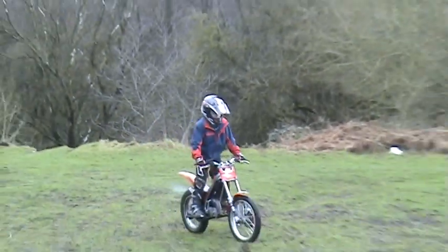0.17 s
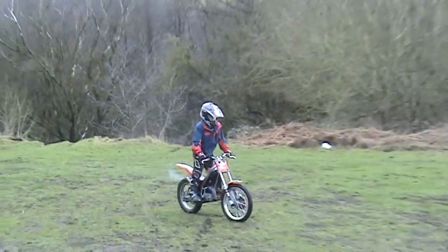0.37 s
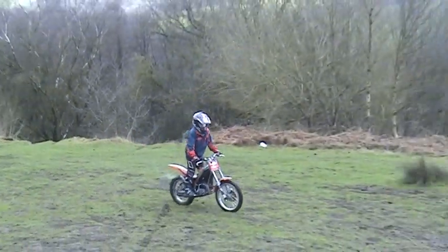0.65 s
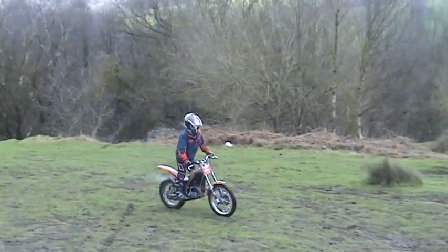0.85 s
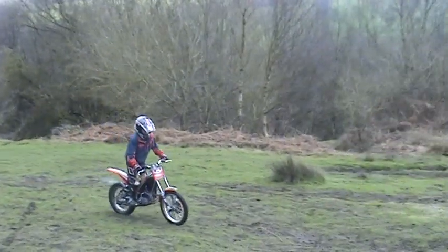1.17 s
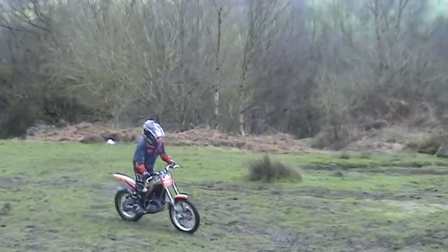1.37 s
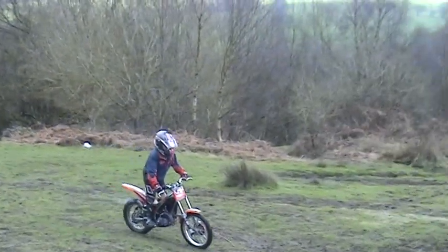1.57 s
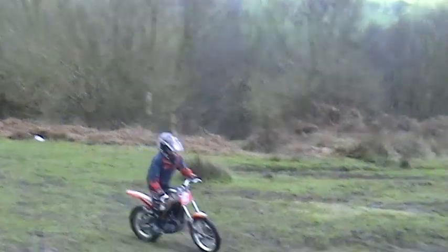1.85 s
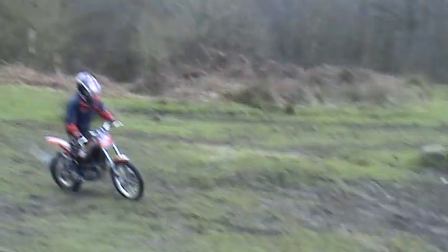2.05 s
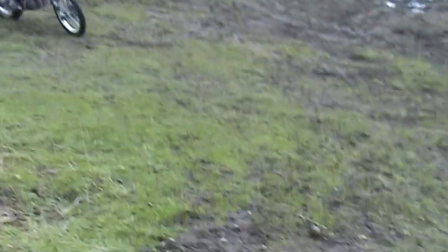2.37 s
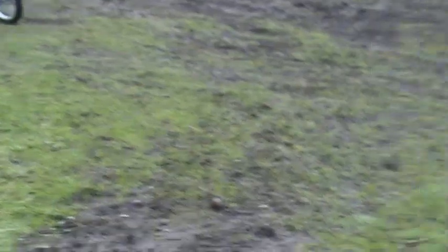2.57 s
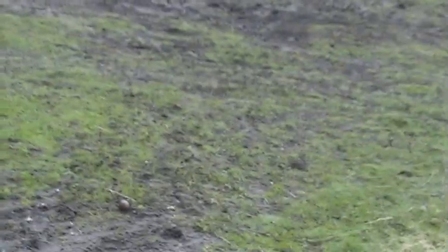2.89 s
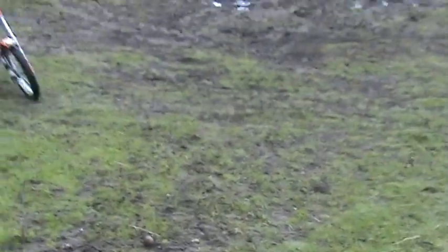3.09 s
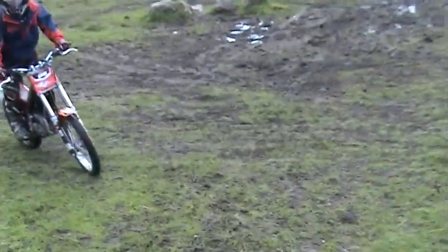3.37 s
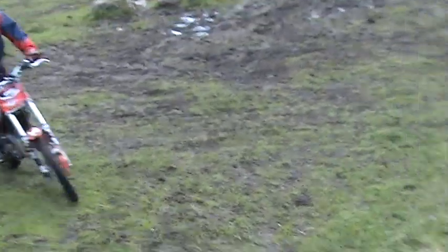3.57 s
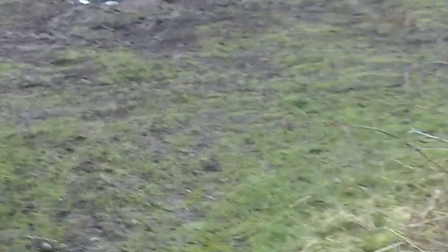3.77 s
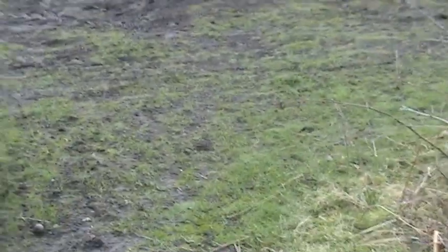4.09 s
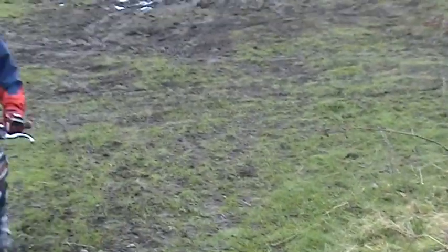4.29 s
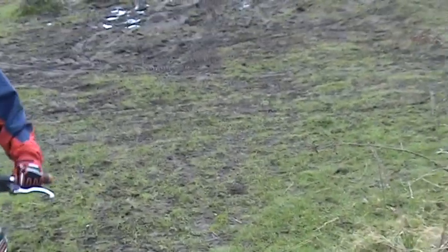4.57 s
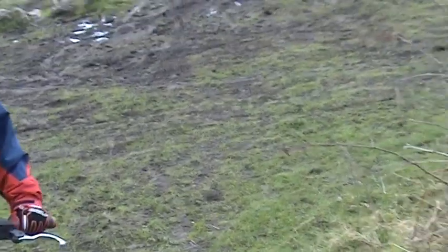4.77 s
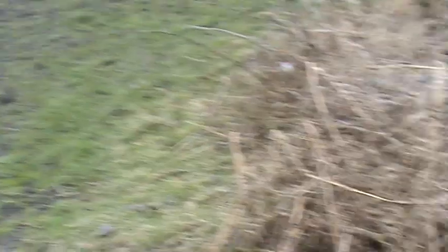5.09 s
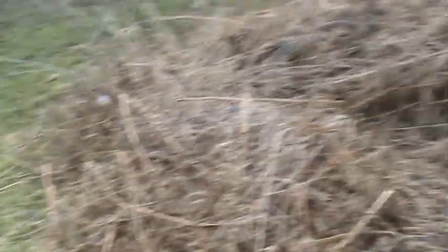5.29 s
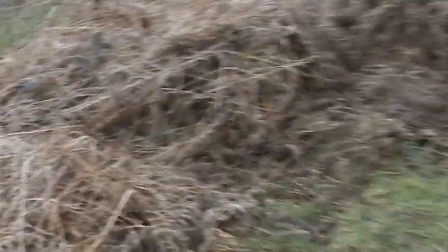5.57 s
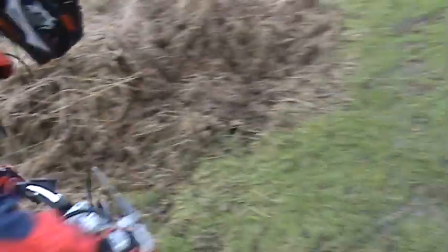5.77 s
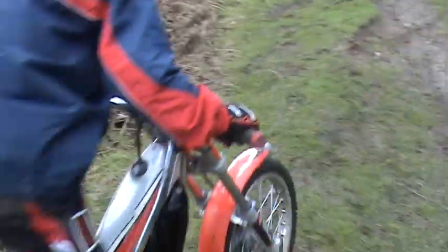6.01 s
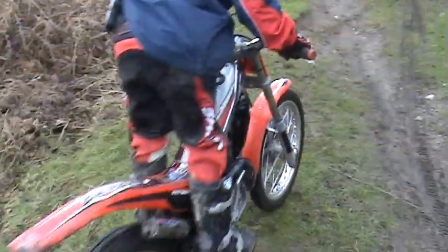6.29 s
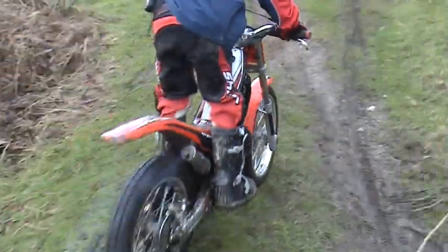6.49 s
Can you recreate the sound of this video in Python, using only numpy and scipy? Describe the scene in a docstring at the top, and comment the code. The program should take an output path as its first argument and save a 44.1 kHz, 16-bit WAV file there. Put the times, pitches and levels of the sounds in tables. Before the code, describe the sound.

Outdoors on soft grass, a single-cylinder two-stroke bike holds a fast, buzzing, metallic rasp over a low drone and light mechanical whir. It recedes, drops a few firings in a short stutter, revs slightly higher and comes back. The tone turns boxy and hollow as it faces the listener, then brash and hissy as it sweeps past close to the microphone and leaves. Little echo, only faint air murmur.

```python
"""In a wet field a two-stroke trials motorcycle rides off, stumbles for a few firings, returns and passes close by.
Each firing sends a sharp crack out of the silencer, rings the pipe and airbox and leaves a puff of gas hiss;
the low engine orders drone underneath, the crankcase whirs and the open air murmurs and hisses faintly.
The colour changes with the side that faces the listener, and the bounce off the wet ground sweeps a comb
(a row of notches) through the exhaust as the machine passes."""
import sys
import numpy as np
from scipy import signal
from scipy.fft import rfft, irfft, next_fast_len
from scipy.io import wavfile
from scipy.ndimage import uniform_filter1d, map_coordinates

SR = 44100
rng = np.random.default_rng(int(sys.argv[2]) if len(sys.argv) > 2 else 0)


def wav_out(sig):
    """Save sig, one row per channel (or a flat mono array), as 16-bit PCM at SR to the path in sys.argv[1]."""
    wavfile.write(sys.argv[1], SR, np.round(np.clip(np.atleast_2d(sig).T, -1, 1) * 32767).astype(np.int16))


N = 292824
SIZE = 2048  # length of one burst, samples
TIME = np.arange(N) / SR  # s
AGE = np.arange(SIZE) / SR  # time since a burst began, s
HZ = np.fft.rfftfreq(SIZE, 1 / SR)  # frequencies in the spectrum of a burst

# crank speed: (time [s], speed [turns per second])
CRANK_SPEED = [(0.0, 83.0), (0.13, 82.8), (0.31, 84.7), (0.79, 86.4), (1.05, 84.9), (1.2, 86.3),
               (1.61, 87.8), (1.85, 85.0), (1.9, 78.1), (1.92, 77.2), (2.11, 89.1), (2.16, 90.6),
               (2.52, 89.8), (2.64, 88.1), (2.83, 87.4), (3.12, 88.4), (3.22, 89.9), (3.37, 88.9),
               (3.48, 91.8), (3.7, 93.8), (4.05, 92.3), (4.42, 93.5), (4.77, 85.1), (4.83, 85.2),
               (5.07, 90.8), (5.29, 92.8), (5.77, 92.5), (6.01, 94.5), (6.42, 89.7), (6.64, 89.2)]
# the ride: (time [s], distance [m], angle between the machine's nose and the listener [degrees])
RIDE_PATH = [(0, 5.9, 50), (1.2, 16.2, 37), (2.6, 21, 30), (3.22, 9.9, 33.4), (3.5, 7.4, 13),
             (4.35, 7.4, 3.9), (4.65, 4.44, 32), (5.05, 3.8, 37), (5.55, 2.24, 89.4), (6, 1.6, 121),
             (6.3, 3.64, 150), (6.64, 7.3, 161)]
# centres of the silencer's boom, of the pipe's bark, which sinks when the rider eases off, and of the
# airbox's gulp: (time [s], boom [Hz], pipe [Hz], airbox [Hz])
CAVITY_CENTRES = [(0, 620, 740, 1140), (.6, 600, 930, 1130), (1.4, 578, 975, 1200), (2.1, 625, 1010, 1145),
                  (2.5, 567, 995, 1127), (3.4, 600, 876, 1194), (3.9, 636, 876, 1134),
                  (4.4, 666, 915, 1170), (4.9, 590, 830, 1210), (5.15, 619, 854, 1130),
                  (5.5, 553, 960, 1070), (5.72, 550, 990, 1170), (5.9, 647, 870, 1220),
                  (6.3, 620, 930, 1225), (6.64, 670, 875, 1140)]
SWAY_RATE = 6  # random turning points a second as the machine rocks over the grass


def amp(db):
    """Decibels to gain."""
    return 10 ** (np.asarray(db) / 20)


def unit(x):
    """Scale to rms 1."""
    return x / np.sqrt(np.mean(x ** 2) + 1e-20)


def along(points, hz):
    """Read (Hz, value) points on a log frequency axis."""
    f, v = np.transpose(points)
    return np.interp(np.log(hz + 1), np.log(f + 1), v)


def read(rows, when):
    """Each column of a curve table at the given times."""
    s, *cols = np.transpose(rows)
    return [np.interp(when, s, c) for c in cols]


def lobe(x, centre, width):
    """A bell that is 1 at the centre."""
    return np.exp(-((x - centre) / width) ** 2)


def wobble(rate):
    """A smooth random curve through rate random points a second."""
    coarse = TIME[::SIZE // 16]
    points = rng.standard_normal(int(N * rate / SR) + 4)
    curve = map_coordinates(points, [coarse * rate])
    return np.interp(TIME, coarse, curve)


def sway(when, rate):
    """A slow random rocking, read at the firing times."""
    return np.interp(when, TIME, wobble(rate))


def filtered(x, response):
    """x times a response of frequency."""
    m = next_fast_len(N + SR // 2)
    spectrum = rfft(x, m) * response(np.fft.rfftfreq(m, 1 / SR))
    return irfft(spectrum, m)[..., :N]


def causal(db):
    """Minimum-phase responses with the given colours in dB: a sharp front, ringing after it."""
    cepstrum = irfft(np.log(amp(db)))
    cepstrum[:, 1:SIZE // 2] *= 2
    cepstrum[:, SIZE // 2 + 1:] = 0
    return np.exp(rfft(cepstrum))


def resonance(centre_hz, width_hz):
    """A resonance passed twice, so that its skirts are steep."""
    once = 1j * HZ * width_hz / (centre_hz ** 2 - HZ ** 2 + 1j * HZ * width_hz)
    return once ** 2


def delayed(ms):
    """The response of a plain delay."""
    return np.exp(-2j * np.pi * HZ * ms / 1000)


def tails(count, t60, hold=0):
    """Spectra of noise bursts of energy 1 that last for hold seconds, then drop 60 dB every t60 seconds."""
    burst = rng.standard_normal((count, SIZE)) * amp(-60 * np.maximum(AGE - hold, 0) / t60)
    return rfft(burst / np.linalg.norm(burst, axis=1, keepdims=True))


def closeness(when):
    """0 at 10 m and beyond, 1 within about 3 m."""
    distance = read(RIDE_PATH, when)[0]
    return np.clip(np.log(10 / distance) / np.log(3.4), 0, 1)[:, None]


def facing(when):
    """How squarely the nose and the tail face the listener, 0-1 each."""
    front_width, rear_width = 36.7, 28  # degrees
    angle = read(RIDE_PATH, when)[1]
    return lobe(angle, 0, front_width), lobe(angle, 180, rear_width)


def throttle(when):
    """0 while coasting, 1 while the crank gains speed fastest."""
    full_throttle = 57  # gain of speed, turns per second each second
    smooth_speed = uniform_filter1d(read(CRANK_SPEED, TIME)[0], size=4000)
    gain = np.gradient(smooth_speed) * SR
    return np.interp(when, TIME, np.clip(gain / full_throttle, 0, 1))


def burning(when):
    """True while the cylinder fires."""
    # stretches in which the charge does not light: (start [s], end [s])
    misfires = [(.177, .189), (1.84, 1.914)]
    return np.all([(when < a) | (when > b) for a, b in misfires], axis=0)


def firing_times(turns):
    """The moment in seconds at which the crank completes each turn."""
    return np.interp(np.arange(np.floor(turns[-1])), turns, TIME)


def level(part, when):
    """The dB of one part at the listener, from distance, the side turned to them, throttle and rocking."""
    # how each part radiates: name: (level at the reference distance [dB], rise per halving of the
    # distance [dB], rise head-on [dB], rise from behind [dB], angle of a side lobe or null [degrees],
    # rise there [dB], rise at full throttle [dB])
    radiation = { "order 1": (-46.5, 3.5, -7.5, -3.5, 75, -16, -4),
                 "order 2": (-43.5, 3.5, 15, -9, 97, -13.5, -1.5),
                 "order 3": (-39, 4, 10.5, 6, 147, -17.5, 2.5),
                 "order 4": (-56, 9, -12, -36, 85.5, 8, 16.5), "crack": (-25, 0.38, -2.5, 5, 116.5, 5, -2),
                 "fizz": (-38, 1.03, 1.5, 18, 129.5, 8, 4)}
    reference_m, side_width, sway_db = 10, 22.4, 1.74  # m, degrees, dB
    base_db, nearer_db, ahead_db, behind_db, side_deg, side_db, throttle_db = radiation[part]
    distance, angle = read(RIDE_PATH, when)
    ahead, behind = facing(when)
    pattern_db = ahead_db * ahead + behind_db * behind + side_db * lobe(angle, side_deg, side_width)
    pattern_db += sway_db * sway(when, SWAY_RATE)
    return base_db + nearer_db * np.log2(reference_m / distance) + pattern_db + throttle_db * throttle(when)


def levelled(spectra, db, when, band):
    """Scale the firings, averaged over five, so that their train has level db inside the band."""
    inside = (HZ > band[0]) & (HZ < band[1])
    energy = 2 * np.sum(abs(spectra[:, inside]) ** 2, axis=1) / SIZE
    power = energy * read(CRANK_SPEED, when)[0] / SR
    gain = amp(db) / np.sqrt(uniform_filter1d(power, size=5) + 1e-20)
    return spectra * gain[:, None]


def train(spectra, when):
    """Lay one burst at each firing time, between the samples."""
    start, fraction = np.divmod(when * SR, 1)
    bursts = irfft(spectra * np.exp(-2j * np.pi * HZ * fraction[:, None] / SR))
    places = start.astype(int)[:, None] + np.arange(SIZE)
    return np.bincount(places.ravel(), bursts.ravel(), N)[:N]


def air(db):
    """Open air: a faint uneven murmur and hiss of shaped noise, different on the left and right."""
    # colour of the open air: (frequency [Hz], relative level per Hz [dB])
    air_colour = [(20, -20), (30, -22), (42, -19), (70, -16), (130, 11), (400, 5.5), (1500, -34),
                  (8000, 10), (15000, -49)]
    noise = rng.standard_normal((2, N))
    shaped = unit(filtered(noise, lambda hz: amp(along(air_colour, hz))))
    return amp(db + 0.53 * wobble(6.0)) * shaped


def crankcase(turns, db, swing_db):
    """Gears and piston rattle on, fired or not, swelling once a turn; partly different left and right."""
    # colour of the whir and gear rattle: (frequency [Hz], relative level per Hz [dB])
    whir_colour = [(150, -10), (400, -6.5), (800, -5), (1250, 2), (1700, -1.5), (2600, 1), (3800, -7.5),
                   (4800, -13), (6500, -9), (9000, -50), (12000, -20), (15000, -47)]
    noise = rng.standard_normal(N) + 0.12 * rng.standard_normal((2, N))
    rattle = unit(filtered(noise, lambda hz: amp(along(whir_colour, hz))))
    return amp(db + swing_db * np.cos(2 * np.pi * (turns - .3)) + wobble(14)) * rattle


def drone(turns, fifth_db, misfire_db):
    """The pulsing of the expansion chamber: clean low orders (multiples of crank speed), weaker in a misfire."""
    # the chamber lifts an order that passes through its resonance
    chamber_hz, chamber_width_hz, chamber_db = 231, 23, 8.5
    when = firing_times(turns)
    levels = [level(part, when) for part in ("order 1", "order 2", "order 3", "order 4")]
    levels.append(levels[-1] + fifth_db)  # the fifth follows the fourth
    sag_db = misfire_db * uniform_filter1d(1. - burning(when), size=3)
    speed, out = read(CRANK_SPEED, when)[0], np.zeros(N)
    for order, db in enumerate(levels, 1):
        db = db + sag_db + chamber_db * lobe(order * speed, chamber_hz, chamber_width_hz)
        waver_db = .35 * wobble(35)
        gain = np.sqrt(2) * amp(np.interp(TIME, when, db) + waver_db)
        out += gain * np.cos(2 * np.pi * order * (turns - .22))
    return out


def reflections(when, t60, hold=0, count=12):
    """One pattern of reflections per firing; it drifts as the machine moves, faster when it is close."""
    patterns = tails(count, t60, hold)
    # even out the broad colour of each pattern
    patterns /= np.sqrt(uniform_filter1d(abs(patterns) ** 2, size=12, axis=1) + 1e-9)
    place = np.cumsum(1 + 2 * closeness(when))
    place = place / place[-1] * (count - 1)
    # cross-fade from each pattern to the next
    blend = np.cos(np.pi / 2 * np.clip(place[:, None] - np.arange(count), -1, 1))
    return blend @ patterns


def ground(when):
    """The wet grass returns a duller copy, stronger up close; its changing lag slides a comb through the exhaust."""
    # lag of the bounce behind the direct sound, longest as the machine passes: (time [s], lag [ms])
    ground_lag = [(0, .46), (.4, .54), (1.2, .49), (1.8, .5), (2.3, .46), (2.7, .48), (3, .57), (3.25, .73),
                  (3.6, .8), (3.95, 1.01), (4.25, 1.12), (4.85, 1.19), (5.05, 1.4), (5.55, 2.05),
                  (5.75, 2.43), (6, 2.9), (6.15, 2.56), (6.64, 1.7)]
    far, near, soak_hz = .4, .52, 8000  # shares that bounce; the grass soaks up the treble
    bounce = (far + (near - far) * closeness(when)) / (1 + (HZ / soak_hz) ** 2)
    lag_ms = read(ground_lag, when[:, None])[0]
    return (1 + bounce * delayed(lag_ms)) / np.sqrt(1 + bounce ** 2)


def paths(when):
    """Every pulse is heard again after its trip down the expansion chamber, and again off the ground."""
    round_trip_ms, share_back = 3.88, .18
    return (1 + share_back * delayed(round_trip_ms)) * ground(when)


def airbox(when):
    """The airbox gulps at each turn, kept ringing by echoes and rushing gas; it rasps most head-on."""
    # level of the gulp of a full-size firing: (time [s], level [dB])
    gulp_levels = [(0, -31.5), (.5, -37.5), (1, -39.5), (1.5, -41), (2, -32), (2.5, -36), (3, -35),
                   (3.45, -34), (3.9, -23), (4.45, -21), (4.7, -25), (5.1, -36.5), (5.4, -37), (5.8, -51),
                   (6, -28.5), (6.64, -32)]
    centre_hz = read(CAVITY_CENTRES, when[:, None])[2]
    rasp = .2 + .6 * facing(when[:, None])[0]
    drive = 1 + .8 * reflections(when, t60=.1) + rasp * tails(len(when), t60=.1)
    gulps = drive * resonance(centre_hz, width_hz=220)
    return levelled(gulps, read(gulp_levels, when)[0], when, (0, SR))


def cavities(when, echo, near_echo, rough, rough_ahead, t60, lag_ms):
    """Each firing rings all the exhaust's resonances together; the higher are rougher, most of all head-on."""
    # level of the silencer's boom: (time [s], level [dB])
    boom_levels = [(0.0, -33), (0.05, -35), (0.39, -33.5), (0.89, -40.5), (1.81, -40.5), (1.85, -39),
                   (1.98, -36), (2.37, -39), (2.7, -48.5), (4.4, -30), (4.6, -36), (4.94, -30),
                   (5.14, -27.5), (5.68, -33.5), (5.73, -39.5), (6.08, -23.5), (6.32, -33), (6.64, -35)]
    # level of the pipe's bark: (time [s], level [dB])
    pipe_levels = [(0.0, -44), (0.03, -39), (0.96, -42.5), (0.98, -37), (1.2, -42), (1.64, -39.5),
                   (1.83, -45), (2.09, -35.5), (2.68, -36.5), (3.2, -31.5), (3.37, -28.5), (4.18, -23),
                   (4.62, -26.5), (4.99, -20), (5.2, -28), (5.84, -25.5), (6.36, -32), (6.64, -32)]
    # level of the tailpipe's clear ring: (time [s], level [dB])
    tailpipe_levels = [(0, -47), (.5, -41), (1, -53), (1.3, -43), (1.75, -40), (2.2, -48), (2.9, -50),
                       (3.3, -37), (3.8, -28), (4.5, -25), (4.8, -33), (5.1, -43), (5.5, -45), (5.8, -43),
                       (6, -25), (6.15, -32), (6.33, -20.5), (6.47, -28), (6.6, -23.5)]
    # level of the pipe's next mode: (time [s], level [dB])
    overtone_levels = [(0, -31), (.5, -37.5), (1.7, -49), (2.2, -43), (2.6, -59), (3.3, -39), (3.9, -39),
                       (4.7, -28), (5.1, -31), (5.4, -52), (6, -33.5), (6.64, -39)]
    # level of the header's ring: (time [s], level [dB])
    header_levels = [(0.0, -31), (0.03, -31), (0.55, -33), (0.89, -27), (1.61, -30.5), (1.81, -29),
                     (1.9, -34), (1.92, -28.5), (2.03, -27.5), (3.0, -36), (3.4, -25.5), (3.85, -31),
                     (4.96, -24.5), (5.07, -31), (5.86, -22.5), (5.9, -20), (6.55, -27), (6.64, -29)]
    header_centre_hz, header_drift = 2500, .006  # the drift is a share of the centre
    boom_hz, pipe_hz, _ = read(CAVITY_CENTRES, when[:, None])
    header_hz = header_centre_hz * (1 + header_drift * sway(when[:, None], SWAY_RATE))
    # (levels, centre in Hz, width in Hz)
    modes = [(boom_levels, boom_hz, 147),
             (pipe_levels, pipe_hz, 300),
             (tailpipe_levels, 1309, 184),
             (overtone_levels, 1882, 320),
             (header_levels, header_hz, 314)]
    height = np.minimum(HZ / header_centre_hz, 1)
    echoes = (echo + near_echo * closeness(when)) * np.sqrt(height)
    gas = (rough + rough_ahead * facing(when[:, None])[0]) * np.sqrt(height)
    drive = 1 + echoes * reflections(when, t60) + gas * tails(len(when), t60)
    heard = drive * paths(when)
    power = 0
    for levels, hz, width_hz in modes:
        mode = levelled(heard * resonance(hz, width_hz), read(levels, when)[0], when, (0, SR))
        power = power + abs(mode / drive) ** 2
    colour = causal(10 * np.log10(power + 1e-5))
    return colour * drive * delayed(lag_ms * (1 + closeness(when)))


def silencer(when):
    """The colour of the crack in dB: a broad slope and modes that swell and fade as the machine sways."""
    # colour of the crack from afar: (frequency [Hz], relative level per Hz [dB])
    far_colour = [(100, -38), (420, -19), (650, -14), (820, 0.5), (1150, -7), (1480, 0.5), (1680, -5.5),
                  (2100, -2.5), (3000, -3), (3900, 1.5), (4700, -5), (5500, 0.5), (6700, 0.5), (8500, -7),
                  (11000, -17), (12500, -31.5), (15500, -128)]
    # colour of the crack from close by: (frequency [Hz], relative level per Hz [dB])
    near_colour = [(100, -70), (400, -11.5), (900, 2), (1500, -4), (1900, -4), (3100, -2), (3900, -4.5),
                   (4700, -4.5), (5500, -3), (6700, -5.5), (8500, -11.5), (11000, -15.5), (12500, -29),
                   (15500, -61)]
    # upper modes: (frequency [Hz], half width [Hz], lift from afar [dB], lift close by [dB])
    upper_modes = [(3370, 240, 2, 4.5), (4033, 240, 0, 6.5), (5574, 560, 3, 4), (5830, 37, -5, 2.5),
                   (6580, 110, 6.5, 7.5), (7360, 180, 6, 1)]
    # lift of the low treble in the crack, its buzz: (time [s], lift [dB])
    buzz_lift = [(0, 1), (.4, 4), (.6, -2), (1, 4), (1.7, 1.5), (2.05, 2), (2.3, -1), (2.9, 3), (3.4, -0.5),
                 (4.1, 0.5), (4.7, -3), (5.1, -1), (5.6, -0.5), (6.1, 3), (6.64, 1.5)]
    fade_db, fade_rate = 1.5, 4  # depth of the fading; random turning points a second
    close, when = closeness(when), when[:, None]
    db = (1 - close) * along(far_colour, HZ) + close * along(near_colour, HZ)
    for hz, width_hz, far_db, near_db in upper_modes:
        lift_db = far_db + (near_db - far_db) * close + fade_db * sway(when, fade_rate)
        db = db + lift_db * lobe(HZ, hz, width_hz)
    return db + read(buzz_lift, when)[0] * lobe(HZ, 4050, 690)


def crack(when, db, fizz_db, echo_t60, hiss_t60, hiss_db, close_hiss_db):
    """The port opens: a steep spike, its reflections, and turbulent gas that is new at every firing."""
    # scatter off frame and rider against the direct spike:
    # (level from afar [dB], rise head-on [dB], rise close by [dB], rise from behind [dB])
    scatter_levels = (-6, 16, 11, 8)
    close, (ahead, behind) = closeness(when), facing(when[:, None])
    far_db, ahead_db, close_db, behind_db = scatter_levels
    scatter = amp(far_db + ahead_db * ahead + close_db * close + behind_db * behind)
    # close by or from behind, the tailpipe blows a dense jet for as long as the port stays open
    jet = np.maximum(close ** 2, behind) * reflections(when, t60=.035, hold=.003)
    echoes = np.sqrt(1 - .75 * np.maximum(close ** 4, behind)) * reflections(when, echo_t60)
    shock = (scatter * (echoes + jet) - 1) / np.sqrt(1 + scatter ** 2)  # the spike points downwards
    turbulence = HZ / 5000  # a larger share of the treble is gas noise
    gas = amp(hiss_db + close_hiss_db * close) * turbulence * tails(len(when), hiss_t60)
    burst = (shock + gas) * causal(silencer(when))
    top = 1 / (1 + (7800 / (HZ + 1)) ** 12)  # hands over from body to fizz near 7800 Hz
    body = levelled(burst, db, when, (3100, 7500))
    fizz = levelled(burst, fizz_db, when, (8000, 14000))
    return (1 - top) * body + top * fizz


def exhaust(turns):
    """One firing per turn of the crank, each a little different in size and timing."""
    when = firing_times(turns)
    when = np.abs(when + 6e-6 * rng.standard_normal(len(when)))
    crack_db, fizz_db = level("crack", when), level("fizz", when)
    cracks = crack(when, crack_db, fizz_db, echo_t60=.1, hiss_t60=.05, hiss_db=-9.5, close_hiss_db=2.5)
    bursts = paths(when) * cracks
    # subtracted, so that the ringing points the same way as the downward spike
    bursts -= cavities(when, echo=.7, near_echo=-.1, rough=.22, rough_ahead=.25, t60=.09, lag_ms=.6)
    size = amp(.45 * rng.standard_normal(len(when))) * burning(when)
    gulp_size = np.maximum(size, .45)  # the airbox keeps gulping when the charge fails
    return train(bursts * size[:, None] + airbox(when) * gulp_size[:, None], when)


def small_opening(x, corner_hz):
    """A narrow tailpipe radiates almost no deep bass."""
    return filtered(x, lambda hz: hz ** 2 / (hz ** 2 + corner_hz ** 2))


def spread(x, t60):
    """Short dense echoes, opposite in sign left and right, widen the sound; a level difference places it."""
    # balance of the two sides: (time [s], left minus right [dB])
    balance = [(0, -.5), (1.8, -.3), (2.75, 1.2), (4, .5), (5.8, 2.2), (6.6, 0)]
    # strength of the difference between the sides: (frequency [Hz], side against middle [dB])
    side_colour = [(100, -39), (1000, -18), (2500, -17), (5000, -10.5), (8000, -38), (12000, -0.5)]
    walls = irfft(tails(1, t60)[0])
    side = filtered(signal.oaconvolve(x, walls)[:N], lambda hz: amp(along(side_colour, hz)))
    lean = amp(read(balance, TIME)[0] / 2)
    return np.array([(x + side) * lean, (x - side) / lean])


def scene():
    """The motorcycle in the open field."""
    background = air(db=-40.5)
    turns = np.cumsum(read(CRANK_SPEED, TIME)[0]) / SR
    nearness = amp(2.2 * closeness(TIME)[:, 0])  # the rattle rises a little close by
    rattle = nearness * crankcase(turns, db=-36.5, swing_db=1.5)
    low_orders = drone(turns, fifth_db=-0.5, misfire_db=-9)
    firings = small_opening(exhaust(turns), corner_hz=126)
    engine = spread(firings + low_orders, t60=0.019)
    return background + rattle + engine


def record(dry):
    """Round off the tallest spikes and keep nothing above the band limit."""
    top_hz = 15700
    rounded = dry / (1 + (dry / .6) ** 6) ** (1 / 6)
    return filtered(rounded, lambda hz: hz < top_hz)


dry = scene()
out = record(dry)
wav_out(out)
```